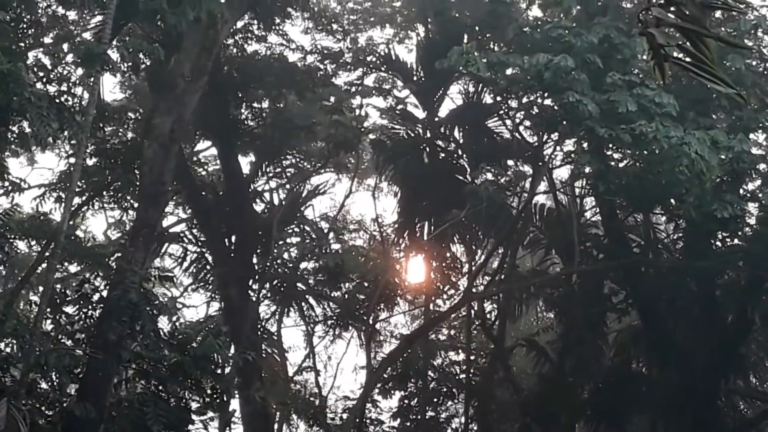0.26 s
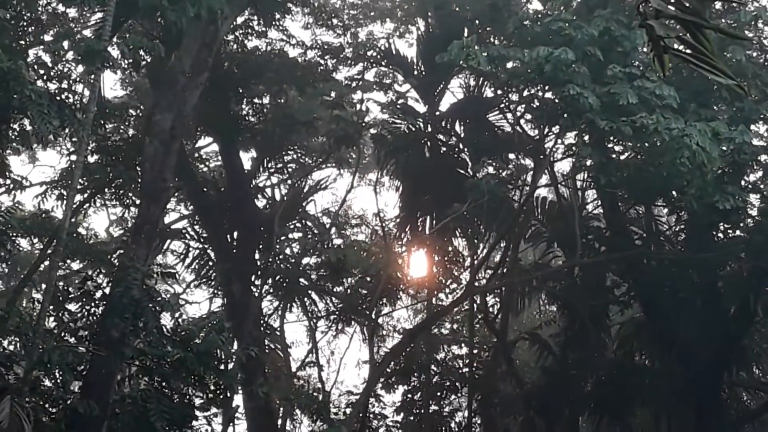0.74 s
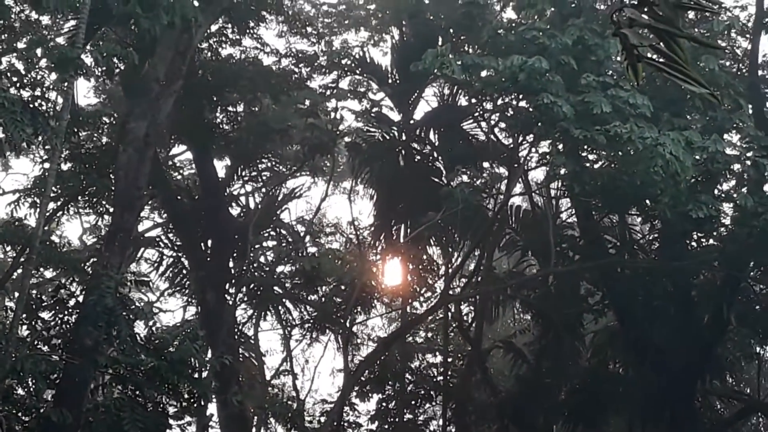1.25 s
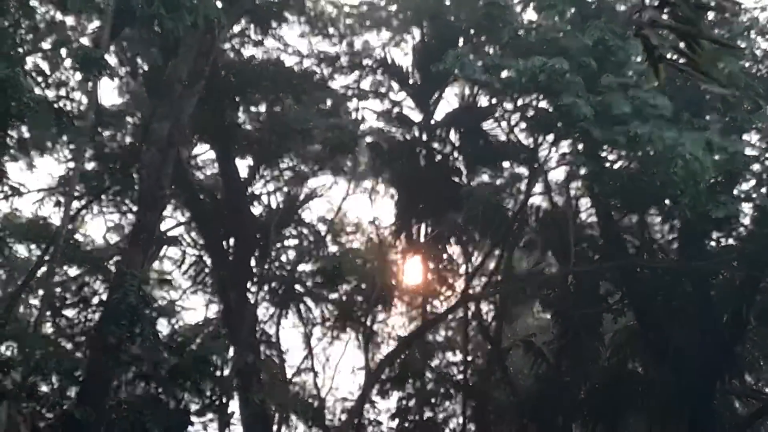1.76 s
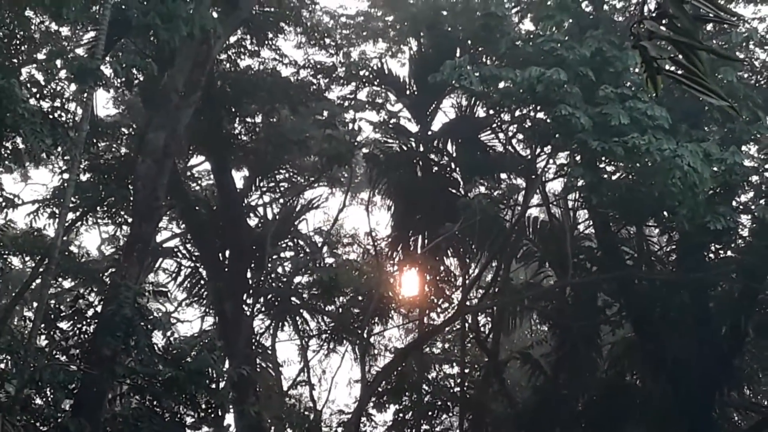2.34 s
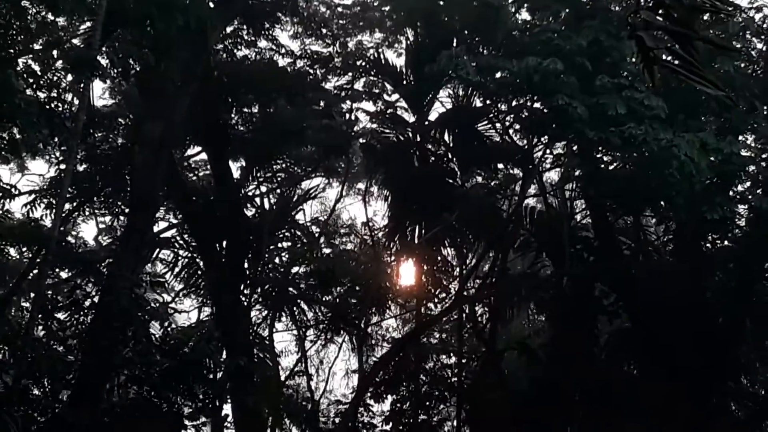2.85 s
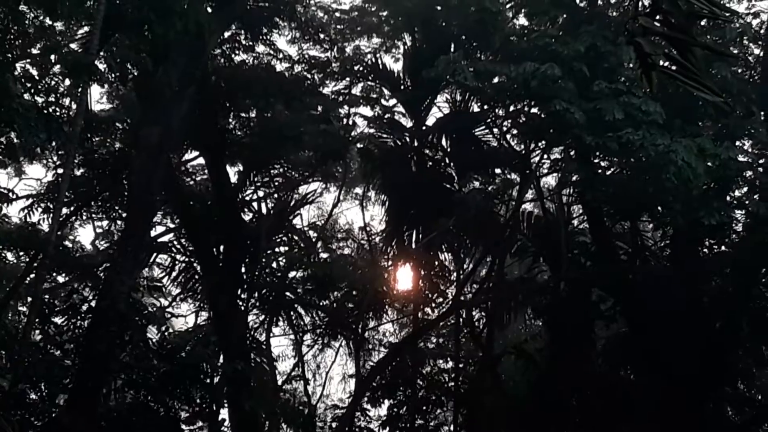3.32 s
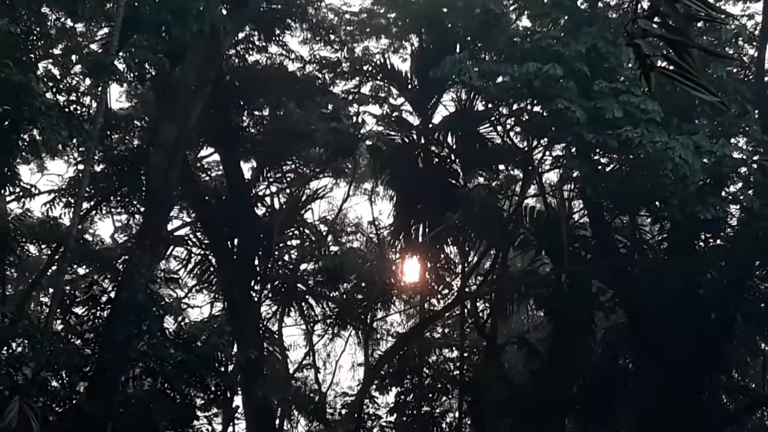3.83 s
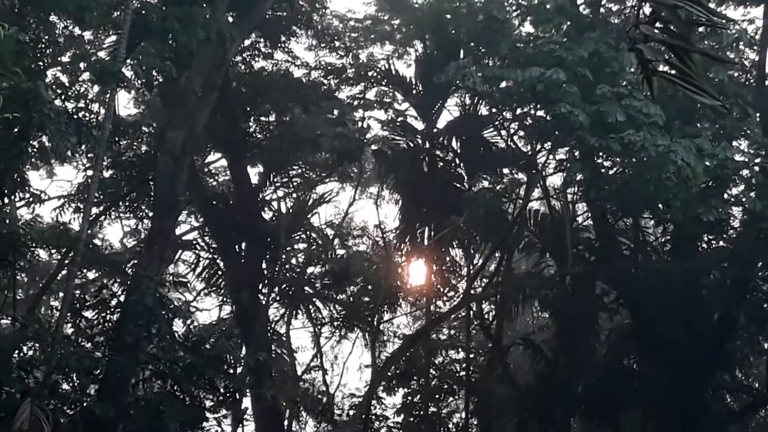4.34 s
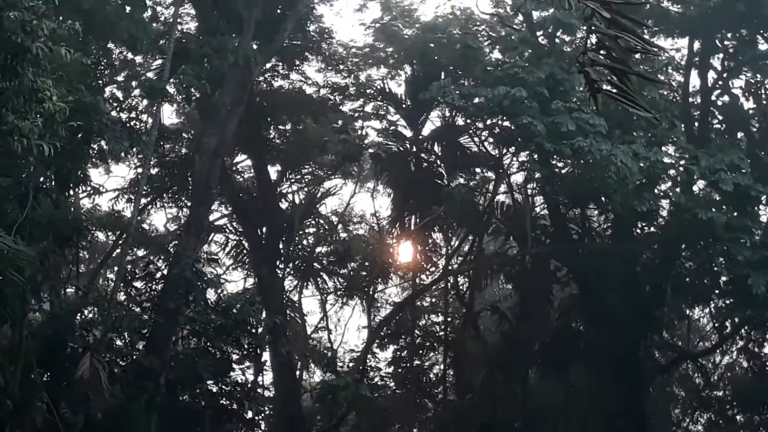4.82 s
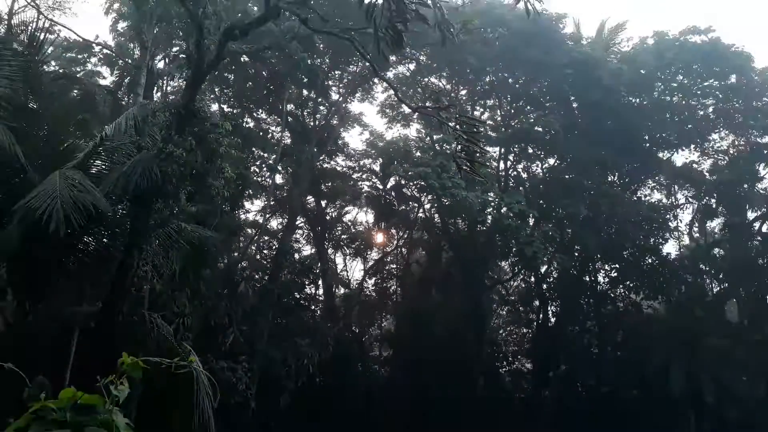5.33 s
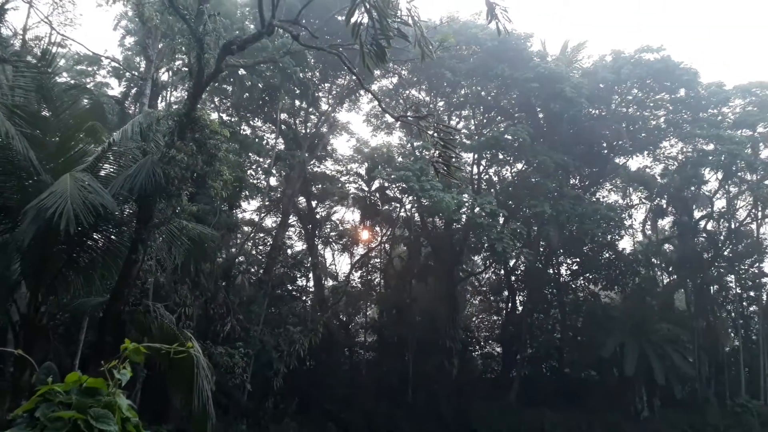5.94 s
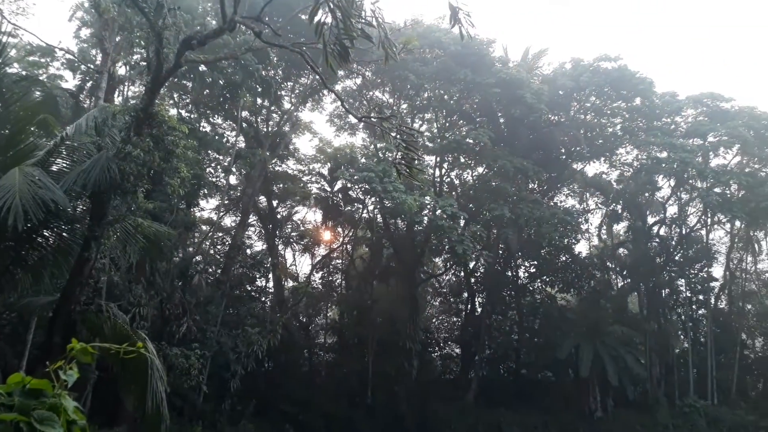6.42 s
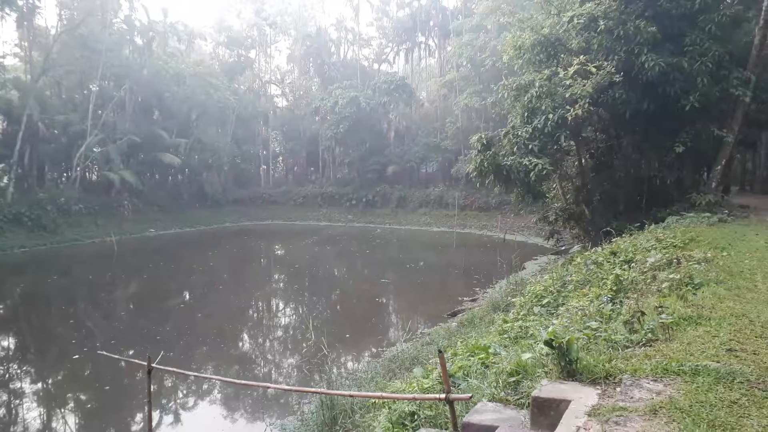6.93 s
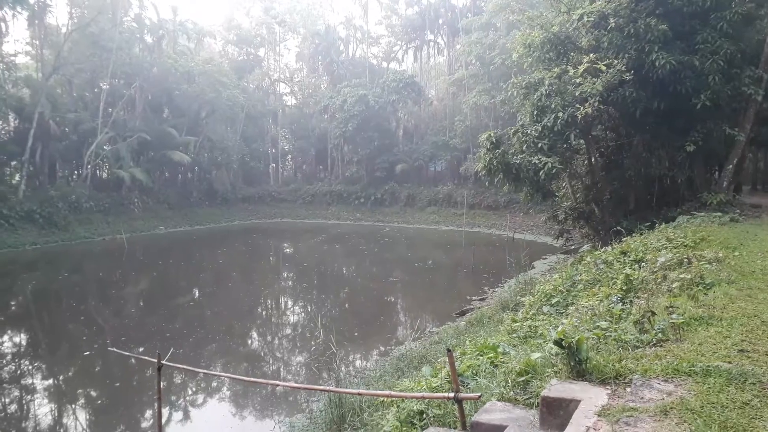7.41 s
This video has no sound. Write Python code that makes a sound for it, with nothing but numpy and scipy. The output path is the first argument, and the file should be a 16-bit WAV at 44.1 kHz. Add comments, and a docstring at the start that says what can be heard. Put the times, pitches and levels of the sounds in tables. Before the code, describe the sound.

Dawn birds whistle, chirp, trill and squawk over one another among tall trees, above shimmering high insects and faint distant leaf sweeping.

```python
"""Among tall trees by a pond at dawn, an almost mono microphone: birds whistle, squawk, chirp and trill.
Calls are gliding sines; fast pitch swings make them rasp, and decaying noise echoes scatter them.
Insects ring in the treble as resonated pulses and noise; someone far off seems to sweep leaves (shaped noise).
Wings flutter by as low air pulses, twigs tick, and far hoots and filtered noise lie behind."""
import sys
import numpy as np
from scipy import signal
from scipy.fft import rfft, irfft, next_fast_len
from scipy.io import wavfile

SR = 44100
rng = np.random.default_rng(int(sys.argv[2]) if len(sys.argv) > 2 else 0)


def int16_out(signal):
    """Quantize to a 16-bit WAV file."""
    q = np.round(np.clip(np.atleast_2d(signal).T, -1, 1) * 32767)
    wavfile.write(sys.argv[1], SR, q.astype(np.int16))


N = 338247
T = np.arange(N) / SR   # t/s

# Table levels are those of each source ahead of its own trims and the final mix.
# Clear whistles: start t/s, length t/s, first f/Hz, middle f/Hz, last f/Hz, peak level/dB,
# share of the length before the peak [0-1]
WHISTLES = [(.14, .025, 3800, 3870, 3870, -62, .5), (0.146, .02, 3080, 3020, 2980, -57, .5),
            (0.167, .03, 3870, 3900, 3870, -67, .4), (0.212, 0.021, 3900, 3870, 3850, -56, .5),
            (.235, .015, 3850, 3520, 3300, -54, 0.39), (.258, .032, 2716, 2326, 2700, -39, 0.28),
            (0.281, .032, 2595, 2393, 1490, -44, 0.84), (3.0, .1, 1806, 1733, 1690, -57, .5),
            (3.22, .14, 2320, 2316, 2320, -58, .3), (4.15, .07, 2316, 2080, 2000, -49.5, 0.67),
            (4.22, .1, 3032, 2830, 2740, -55, 0.14), (4.362, 0.023, 2076, 1980, 2000, -43, .5),
            (4.394, 0.032, 2140, 2330, 2470, -41, 0.4), (4.638, 0.058, 2650, 2530, 2400, -44.5, .55),
            (4.705, .03, 800, 772, 769, -49, 0.33), (4.76, .03, 730, 774, 756, -51, .45),
            (4.85, .23, 794, 746, 689, -55, 0.14), (5.03, .12, 4010, 4100, 4180, -58, .5),
            (5.14, .33, 721, 702, 656, -63, 0.087), (5.42, .08, 3400, 3460, 3500, -56, .3),
            (5.584, .045, 7780, 7630, 7250, -56, .4), (5.595, .06, 1925, 2303, 2670, -39.5, 0.48),
            (5.7, .1, 2120, 2200, 2070, -48, 0.18), (5.671, .045, 4330, 4100, 4000, -62, .5),
            (5.715, .022, 6450, 6300, 6060, -54, .5), (5.783, 0.026, 5980, 5680, 5200, -49, .5),
            (5.81, .102, 2230, 2084, 1480, -40.5, 0.71), (5.98, .14, 7080, 6990, 6950, -58.5, 0.18),
            (6.0, .1, 6770, 6420, 6480, -56, 0.24), (6.08, .07, 2240, 2300, 2300, -40.5, 0.89),
            (6.09, .08, 4175, 4160, 4010, -56, 0.45), (6.163, .016, 2800, 2170, 1850, -35.5, 0.67),
            (6.176, .055, 1850, 2323, 2700, -37, 0.19), (6.36, .135, 2150, 2120, 1440, -39.5, 0.78),
            (6.46, .22, 3640, 3520, 3490, -56.5, .15), (6.582, 0.024, 1994, 2210, 2330, -35, 0.4),
            (6.63, .17, 756, 707, 657, -60, 0.35), (6.8, .12, 4230, 4150, 4060, -52.5, 0.88),
            (6.93, .05, 3490, 3470, 3350, -49, 0.45), (7.47, .09, 2047, 2150, 2025, -53, 0.44)]
EDGE_DROP_DB = 9   # whistles and squawks start and end this far below their peak

# Harsh squawks: the same seven columns, then pitch swing f/Hz
SQUAWKS = [(.07, 0.056, 2285, 2238, 2130, -46.5, 0.57, 324),
           (1.763, .17, 2250, 2363, 2550, -45.5, 0.34, 160), (2.02, 0.033, 2790, 2610, 2350, -47, .4, 90),
           (2.06, .055, 2650, 2800, 2650, -51, .4, 120), (4.45, .05, 1940, 1820, 1830, -56, .4, 99),
           (6.235, 0.046, 2463, 2200, 2120, -35, .5, 100)]
SWINGS_PER_S = 260   # middle rate; it wanders
# Loudest bird's cries: start t/s, length t/s, level/dB, sunk pitch f/Hz
CRIES = [(5.916, .102, -29.5, 2266), (6.501, .09, -31.5, 1990)]
# Shape of a cry: share of its length [0-1], share of the way from top to sunk pitch [0-1],
# level/dB, pitch swing f/Hz
CRY_SHAPE = [(0, 0.83, -5, 120), (.1, .1, 2.5, 170), (.3, 0.019, -4.5, 300), (.6, .65, -4, 300),
             (.88, 1.0, 1.5, 70), (1, 0.77, -16, 60)]
CRY_TOP_HZ, CRY_FIFTH_DB = 2821, -37   # top pitch; a faint tone at five times the pitch
# Short warbles: start t/s, level/dB
WARBLES = [(1.853, -47.5), (4.425, -46), (5.65, -44), (6.23, -40)]
WARBLE_S, WARBLE_TOP_HZ, WARBLE_DIP_HZ, WARBLE_SWING_HZ = 0.0518, 2010, 276.5, 59

# A bird's row of falling chirps: t/s of the middle, level/dB
CHIRPS = [(1.0505, -44.5), (1.5596, -42), (1.8337, -43), (2.1072, -43.5), (2.374, -42.5), (2.6534, -43.5),
          (2.9124, -42), (3.1862, -43), (3.475, -43), (3.7575, -44.5), (4.0394, -44), (4.3282, -43.5),
          (4.6156, -43), (4.879, -54), (5.1736, -47), (5.455, -46), (6.6763, -50), (6.965, -52.5)]
# Shape of one chirp: t/s from its middle, f/Hz, level/dB
CHIRP_SHAPE = [(-.017, 5500, -11), (-.004, 4400, -3), (.006, 3300, -4), (.016, 2560, 1), (.024, 2380, -9),
               (.055, 2050, -11), (.075, 1980, -28)]
# Thin high note, perhaps an insect, sounding with each chirp: t/s from its middle, f/Hz, level/dB
THIN_NOTE = [(-.01, 5900, -30), (.01, 5920, -22), (.09, 5900, -24), (.13, 5880, -34)]

# Low rolling trill: t/s, f/Hz, level/dB
TRILL = [(2.25, 2060, -42.5), (2.288, 2198, -50), (2.39, 2120, -57), (2.406, 2241, -48), (2.706, 2200, -44),
         (2.771, 2293, -45.5), (2.984, 2194, -44.5), (3.188, 2188, -53.5), (3.2, 2060, -58)]
THROBS_PER_S = 61   # middle rate; it wanders
# Far dove-like phrases: start t/s, length t/s, level/dB
COOS = [(0.455, 0.25, -60), (1.198, 0.48, -58), (2.009, 0.34, -54.5), (2.777, 0.28, -53.5),
        (3.554, 0.33, -56.5)]
COO_HZ, COO_RISE_HZ, COO_NOTES_PER_S = 860, 69.5, 13.84
# Far hollow hoots and a hum: start t/s, end t/s, from f/Hz, to f/Hz, level/dB
HOOTS = [(0, 0.545, 705, 637, -71), (0.707, 1.39, 740.6, 614.5, -66.5), (4.033, 4.364, 584, 557, -69.5),
         (5.854, 6.634, 302.5, 313, -69.5), (7.2, 7.664, 311, 310.5, -68)]

# Lone insects: start t/s, end t/s, pulse rate f/Hz, share of evenly timed strikes [0-1],
# wing resonance f/Hz, width of its narrower stage f/Hz, level/dB
INSECTS = [(-.1, 1.76, 110, .6, 8070, 350, -61), (-.1, 2.6, 150, .2, 7160, 500, -64.5),
           (-.1, 7, 45, .2, 6540, 70, -67), (5.53, 5.93, 120, 0.4, 8040, 700, -59.5),
           (5.53, 6.43, 120, .6, 9550, 330, -67.5), (5.53, 7.8, 120, .3, 7600, 400, -66.5),
           (5.53, 5.68, 120, 0, 6800, 700, -54.5), (5.93, 6.2, 96, .3, 6350, 470, -58)]
INSECT_FADE_S = .04
# Crickets in step: t/s, level/dB, depth of the lull between chirps/dB (negative swells instead)
CRICKETS = [(0, -55.5, 2.5), (.85, -49, 4), (1.6, -54, -2), (2.3, -48.5, 22), (3.9, -46.5, 11),
            (4.4, -57, -3), (5.4, -57.5, 1), (5.8, -53.5, -3), (6.5, -59, 2), (7.4, -56, -3),
            (7.67, -55, 2)]
# the beat rests once and starts afresh
CRICKET_FIRST_S, CRICKET_PAUSE_S, CRICKET_RESTART_S, CRICKET_PERIOD_S = .1, 3.14, 3.4, .243

# Broom strokes: start t/s, swell t/s, hold t/s, peak level/dB, dying away in dB per s
STROKES = [(.745, 0.032, 0.12, -44.5, 76), (1.038, 0.05, .24, -42.5, 69), (1.47, 0.14, 0.017, -39, 79),
           (2.644, .03, .12, -45, 106), (3.845, 0.12, 0.075, -42.5, 55), (4.719, 0.039, .16, -45.5, 95),
           (6.16, 0.041, 0.051, -47, 31), (6.66, .015, 0.12, -53.5, 80), (6.893, 0.14, .02, -50.5, 136),
           (7.26, 0.029, 0.15, -46.5, 32)]
STROKE_SWELL_DB = 13.5
# Colour of bristles on leaves: f/Hz, relative level/dB per Hz
BROOM_COLOUR = [(760, -51), (1300, -23.5), (1830, -6), (2090, -1.5), (4070, -0.5), (4850, -9.5),
                (7660, -14.5), (8320, -14), (9720, -25), (15500, -35.5)]

# Wings passing: number of beats, gap t/s between them
FLUTTER_PACE = [(2, .0235), (3, .0303), (4, .023), (7, .0253)]
FLUTTER_START_S, FLUTTER_NEAREST_S, FLUTTER_DB = 4.534, 4.672, -42.5
COMING_DB_PER_S, GOING_DB_PER_S, WING_SPREAD_DB = 85, 48, 1.5
# Single soft bumps: t/s, level/dB
BUMPS = [(1.6, -61), (3.426, -48), (3.713, -58), (4.366, -53.5), (5.447, -53.5), (5.591, -46), (5.831, -52)]
# Twig ticks: t/s, level/dB, centre f/Hz
TICKS = [(3.426, -25.5, 1080), (3.427, -42, 7000), (3.865, -26, 10900), (4.045, -38, 12000),
         (5.588, -39, 650), (5.574, -30, 3500), (5.697, -25, 3200), (6.148, -39, 3140)]

# Far wash of the wood: t/s, low murmur level/dB, far chorus level/dB
WASH = [(0, -65, -61.5), (.7, -65, -62), (1.2, -63.5, -64), (1.49, -62, -47.5), (1.83, -65, -59),
        (2.9, -63.5, -55.5), (3.5, -64, -58.5), (4.76, -61.5, -53.5), (5.47, -67, -60), (5.6, -59.5, -57.5),
        (6.43, -61.5, -50), (6.84, -62.5, -62.5), (7.67, -63.5, -58.5)]
WASH_FLICKER_DB = 1.5
# Noise colours, each: f/Hz, relative level/dB per Hz
MURMUR = [(260, -21), (450, -9), (785, -5.5), (897, -3), (1180, -1), (1400, -8), (1700, -13), (2210, -30),
          (3740, -120)]
CHORUS = [(820, -38), (1400, -15), (2090, 2.5), (2300, 0.5), (2480, -0.5), (3810, 1), (4060, -3.5),
          (4500, -9), (5850, -12), (9900, -120)]
RUMBLE = [(18, -47), (30, -16), (92, -3), (130, -2.5), (308, -4), (435, -11.5), (520, -20), (680, -4),
          (1140, -120)]
AIR = [(2350, -52), (4000, -13), (5020, 0.5), (5470, -55), (5730, 0), (6380, -4), (8770, -3.5),
       (11000, -21.5), (15600, -20)]
SIDE_NOISE = [(18, -56), (30, -32), (137, 15.5), (1440, 1.5), (6570, -59), (7110, -19), (7900, -24.5),
              (9730, -36), (11400, 3), (15600, 2.5)]   # opposite in the two channels
RUMBLE_DB, AIR_DB, SIDE_DB = -66.5, -58.5, -78.5

# scatter from the whole wood and from close branches; both set in after the same delay
TREES_T60_S, NEAR_ECHO_T60_S, ECHO_ONSET_S = 0.74, .09, 0.002
ECHO_BLUR_PER_S = 250
OFFSET, CUTOFF_HZ = -.0006, 15880   # constant shift of full scale; 60 dB down from here up


def whistles():
    """Near-sine notes with a fast flutter of pitch and level, both growing with the pitch."""
    out, waver, flutter = np.zeros(N), drift(170), drift(140)
    for row in WHISTLES:
        note, middle_khz = np.zeros(N), row[3] / 1000
        add_note(note, arc(*row), 24 * middle_khz * waver)
        out += note * amp(1.1 * middle_khz * flutter)
    return out


def harsh_calls():
    """Notes whose pitch swings fast and unevenly, so that they spread into a rasp."""
    beat = np.sin(2 * np.pi * np.cumsum(SWINGS_PER_S * amp(2.7 * drift(60))) / SR)
    swing = .7 * beat + .7 * drift(450)
    calls = cries(swing) + squawks(swing) + warbles(swing)
    return calls * amp(-1.0 + 1.6 * drift(250))


def cries(swing):
    """The loudest bird: a bending, rasping tone with a faint one at five times its pitch."""
    out = np.zeros(N)
    share, sunk, shape_db, swing_hz = np.transpose(CRY_SHAPE)
    for start, length, db, low_hz in CRIES:
        at = start + length * share
        hz = CRY_TOP_HZ + sunk * (low_hz - CRY_TOP_HZ)
        rasp_hz = swing * np.interp(T, at, swing_hz)
        add_note(out, np.transpose([at, hz, db + shape_db]), rasp_hz, fade=0.0017)
        add_note(out, np.transpose([at, 5 * hz, db + shape_db + CRY_FIFTH_DB]), 5 * rasp_hz)
    return out


def squawks(swing):
    """Short arcs of pitch, roughened by the fast swing."""
    out = np.zeros(N)
    for *note, swing_hz in SQUAWKS:
        add_note(out, arc(*note), swing * swing_hz, fade=0.001)
    return out


def warbles(swing):
    """Brief level tones whose pitch dips twice, lightly roughened."""
    out = np.zeros(N)
    for start, db in WARBLES:
        dips_hz = WARBLE_DIP_HZ * np.abs(np.sin(2 * np.pi * (T - start) / WARBLE_S))
        rows = [(start, WARBLE_TOP_HZ, db), (start + WARBLE_S, WARBLE_TOP_HZ, db)]
        add_note(out, rows, swing * WARBLE_SWING_HZ - dips_hz, fade=0.0017)
    return out


def chirps():
    """The same falling note again and again, husky from pitch jitter; a thin high note sounds with each."""
    out, husk_hz, flutter_hz = np.zeros(N), 90 * drift(500), 70 * drift(200)
    for middle, db in CHIRPS:
        add_note(out, np.array(CHIRP_SHAPE) + [middle, 0, db - 2.5], husk_hz)
        add_note(out, np.array(THIN_NOTE) + [middle, 0, db + 4], flutter_hz)
    return out * amp(1.5 * drift(200))


def trill():
    """A wavering tone chopped into uneven throbs."""
    hz, db = in_time(TRILL)
    throb_rate = THROBS_PER_S * amp(1.5 * drift(30))
    throb = .55 + .45 * np.cos(2 * np.pi * np.cumsum(throb_rate) / SR)
    tone = np.sin(2 * np.pi * np.cumsum(hz + 30 * drift(120)) / SR)
    level = amp(db + 3.5 + 2.7 * drift(22.06))
    return level * throb * tone * gate(TRILL[0][0], TRILL[-1][0], 0.019)


def coos():
    """Each phrase is a string of short hollow sine notes climbing a little."""
    out = np.zeros(N)
    for start, length, db in COOS:
        notes = np.maximum(np.sin(2 * np.pi * COO_NOTES_PER_S * (T - start)), 0)
        hz = COO_HZ + COO_RISE_HZ * np.clip((T - start) / length, 0, 1)
        tone = np.sin(2 * np.pi * np.cumsum(hz) / SR)
        out += amp(db) * gate(start, start + length, 0.032) * notes * tone
    return out


def hoots():
    """Breathy low tones, their pitch and level unsteady with distance."""
    out = np.zeros(N)
    for start, end, from_hz, to_hz, db in HOOTS:
        hz = np.interp(T, [start, end], [from_hz, to_hz]) + 22 * drift(45)
        tone = np.sin(2 * np.pi * np.cumsum(hz) / SR)
        out += amp(db + 3.1 * drift(16)) * gate(start, end, 0.03) * tone
    return out


def insects():
    """Lone singers start and stop by narrow wing resonances; a swarm goes on, pulsing in step."""
    swarm = stridulate(5096, 300, 66, .12) + amp(-2) * stridulate(4650, 350, 49, .12)
    level_db, lull_db = in_time(CRICKETS)
    early = T < CRICKET_RESTART_S - CRICKET_PERIOD_S / 2
    before_rest = np.minimum(T, CRICKET_PAUSE_S) - CRICKET_FIRST_S
    beating = np.where(early, before_rest, T - CRICKET_RESTART_S)
    lull = np.sin(np.pi * beating / CRICKET_PERIOD_S) ** 2
    out = amp(level_db - lull_db * lull - 6.0) * swarm
    for start, end, per_s, steady, hz, width_hz, db in INSECTS:
        level = amp(db + 2.8 * drift(5)) * gate(start, end, INSECT_FADE_S)
        out += level * stridulate(hz, width_hz, per_s, steady)
    return out


def stridulate(hz, width_hz, per_s, steady):
    """Wing-file noise and evenly timed tooth strikes, ringing in a narrow wing resonance; rms 1."""
    share = np.clip(steady, 0, 1)
    strikes = np.diff(np.floor(per_s * T), prepend=0) * amp(2.0 * rng.standard_normal(N))
    file = (1 + share * np.cos(2 * np.pi * per_s * T)) * rng.standard_normal(N)
    rub = share * rms_one(strikes) + (1 - share) * rms_one(file)
    return rms_one(resonate(resonate(rub, hz, width_hz), hz, width_hz * 2))


def broom():
    """Dense scratchy grains of bristles on dry leaves; each stroke swells, holds and dies away."""
    grains = rng.standard_normal(N) * amp(drift(900) + 1.1 * drift(35))
    power = 0
    for start, swell, hold, db, dying_db in STROKES:
        rising_db = STROKE_SWELL_DB * np.clip(1 - (T - start) / swell, 0, 1)
        falling_db = dying_db * np.maximum(T - start - swell - hold, 0)
        stroke_power = amp(2 * (db - rising_db - falling_db))
        power = power + stroke_power * gate(start, N / SR + 1, 0.0092) ** 2
    return np.sqrt(power) * coloured(grains, BROOM_COLOUR)


def wings_and_bumps():
    """Wing beats and single bumps push a soft low pulse of air that rings down."""
    push = np.zeros(N)
    gaps = [gap for count, gap in FLUTTER_PACE for _ in range(count)]
    beats = FLUTTER_START_S + np.cumsum([0] + gaps)
    coming_db = COMING_DB_PER_S * (FLUTTER_NEAREST_S - beats)
    going_db = GOING_DB_PER_S * (beats - FLUTTER_NEAREST_S)
    spread_db = WING_SPREAD_DB * rng.standard_normal(len(beats))
    wing_db = FLUTTER_DB - np.maximum(coming_db, going_db) + spread_db
    for s, db in BUMPS + list(zip(beats, wing_db)):
        push[round(s * SR)] = amp(db)
    # one beat: a dip of pressure, then a swing back that slows as it dies
    t = T[:SR // 25]
    pulse_hz = 105 + 600 * np.exp(-t / .002)
    pulse = -np.sin(2 * np.pi * np.cumsum(pulse_hz) / SR) * np.exp(-t / .006)
    return signal.fftconvolve(push, 1.47 * pulse / np.abs(pulse).max())[:N]


def ticks():
    """Twigs tick: impulses through two broad resonances, each as wide as its centre frequency."""
    out = np.zeros(N)
    for s, db, hz in TICKS:
        click = np.zeros(N)
        click[round(s * SR)] = amp(db) * SR / hz / 4
        out += resonate(resonate(click, hz, hz), hz, hz)
    return out


def wash():
    """Coloured noises: low rumble, a murmur of far calls, a blur of far birds, and air hiss."""
    murmur_db, chorus_db = in_time(WASH)
    rumble = amp(RUMBLE_DB + WASH_FLICKER_DB * drift(8.6)) * coloured(rng.standard_normal(N), RUMBLE)
    murmur = amp(murmur_db + 3.1 * drift(9)) * coloured(rng.standard_normal(N), MURMUR)
    blur = amp(chorus_db + WASH_FLICKER_DB * drift(16)) * coloured(rng.standard_normal(N), CHORUS)
    return rumble + murmur + blur + amp(AIR_DB) * coloured(rng.standard_normal(N), AIR)


def scatter(x, t60_s):
    """A cloud of echoes from trunks and leaves: noise dying away by 60 dB in t60_s."""
    t = T[:SR] - ECHO_ONSET_S
    echoes = rng.standard_normal(SR) * (t > 0) * amp(-60 * t / t60_s)
    return signal.fftconvolve(x, echoes / np.sqrt(np.sum(echoes ** 2)))[:N]


def add_note(out, rows, waver_hz, fade=0.0021):
    """Add one note: a sine gliding along (t/s, f/Hz, level/dB) rows, its pitch unsteady."""
    s, hz, db = np.transpose(rows)
    at = slice(max(int(s[0] * SR), 0), min(int(s[-1] * SR), N))
    t = T[at]
    pitch = np.interp(t, s, hz) + waver_hz[at]
    edges = np.clip(np.minimum(t - s[0], s[-1] - t) / fade, 0, 1)
    level = np.sqrt(2) * amp(np.interp(t, s, db))   # rms level to sine peak
    out[at] += level * edges * np.sin(2 * np.pi * np.cumsum(pitch) / SR)


def arc(start, length, first_hz, middle_hz, last_hz, peak_db, peak_share):
    """Note rows: pitch bends smoothly through three values, level swells to a peak and falls."""
    u = np.linspace(0, 1, 17)
    # parabola through the three pitches
    hz = first_hz * (1 - u) * (1 - 2 * u) + middle_hz * 4 * u * (1 - u) + last_hz * u * (2 * u - 1)
    away = np.interp(u, [0, np.clip(peak_share, .05, .95), 1], [1, 0, 1])
    return np.transpose([start + length * u, hz, peak_db - EDGE_DROP_DB * away ** 1.47])


def resonate(x, hz, width_hz):
    """A two-pole resonance, gain about 1 on top."""
    r = np.exp(-np.pi * width_hz / SR)
    zeros = (1 - r * r) / 2 * np.array([1, 0, -1])
    poles = [1, -2 * r * np.cos(2 * np.pi * hz / SR), r * r]
    return signal.lfilter(zeros, poles, x + 1e-18)


def coloured(x, spectrum):
    """Shape a sound by a (f/Hz, level/dB) spectrum; rms 1."""
    hz, db = np.transpose(spectrum)
    size = next_fast_len(N)
    bins = np.maximum(np.arange(size // 2 + 1) * SR / size, 1)
    gain = amp(np.interp(np.log(bins), np.log(hz), db))
    return rms_one(irfft(rfft(x, size) * gain, size)[:N])


def drift(rate):
    """Random wander: normal steps of spread 1, rate per second, joined by straight lines."""
    steps = rng.standard_normal(int(N / SR * rate) + 2)
    return np.interp(T * rate, np.arange(len(steps)), steps)


def gate(start, end, fade):
    """1 between two times, with soft ends."""
    return np.clip(np.minimum(T - start, end - T) / fade, 0, 1)


def in_time(rows):
    """Columns of a curve table, sample by sample."""
    s, *columns = np.transpose(rows)
    return [np.interp(T, s, c) for c in columns]


def rms_one(x):
    """Scale to rms 1."""
    return x / np.sqrt(np.mean(x ** 2) + 1e-20)


def amp(db):
    """Gain of a dB value."""
    return 10 ** (np.asarray(db) / 20)


def scene():
    """Calls with their scatter over the beds, nearly the same in both channels."""
    clear, harsh, far = whistles(), harsh_calls(), chirps()
    middle = trill() + coos() + hoots()
    # fast random level changes spread the pitch of the calls' echoes
    blur = .6 + drift(ECHO_BLUR_PER_S)
    held = amp(-6) * clear + amp(-5) * harsh + amp(-3) * middle
    wood_tail = scatter(blur * held + amp(5) * far, TREES_T60_S)
    # close branches blur each glide
    smear = scatter(amp(-10) * clear + amp(-5) * harsh + amp(-8) * far, NEAR_ECHO_T60_S)
    direct = clear + amp(-2) * harsh + amp(-3) * far + middle
    beds = insects() + broom() + wings_and_bumps() + ticks() + wash()
    mid = direct + smear + wood_tail + beds
    side = amp(SIDE_DB) * coloured(rng.standard_normal(N), SIDE_NOISE)
    return np.array([mid + side, mid - side])


def record(dry):
    """The microphone's side: a slight constant offset, and a steep low-pass cuts the top."""
    low_pass = signal.cheby2(24, 60, CUTOFF_HZ, fs=SR, output="sos")
    return signal.sosfilt(low_pass, dry + OFFSET)


dry = scene()
out = record(dry)
int16_out(out)
```